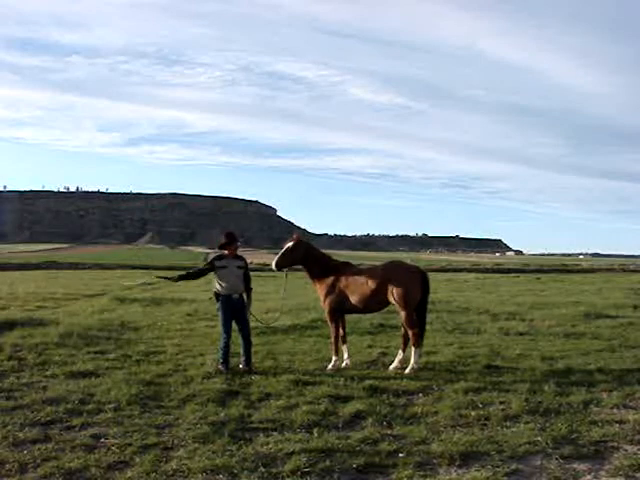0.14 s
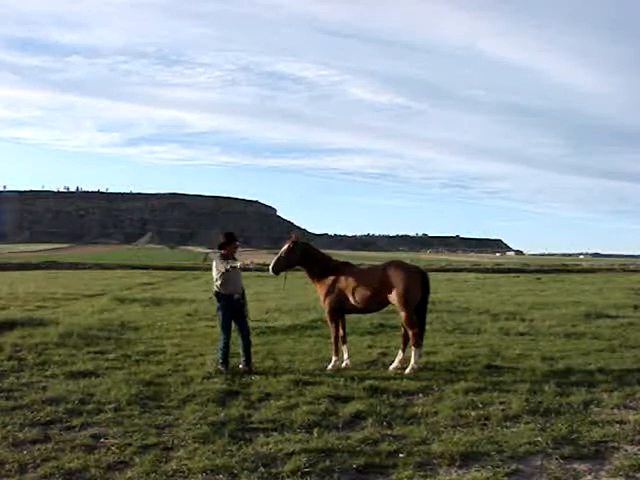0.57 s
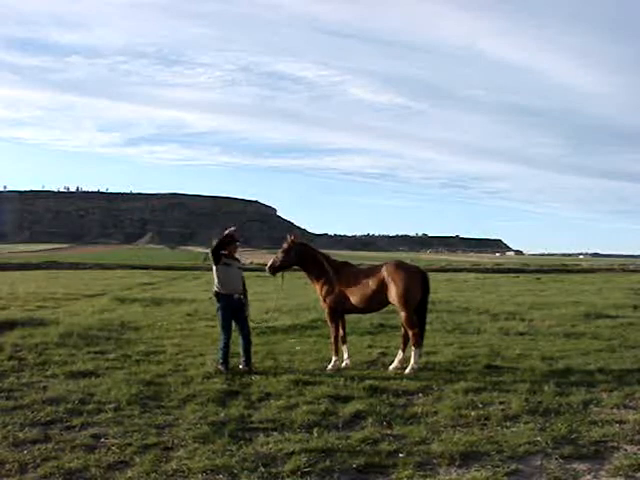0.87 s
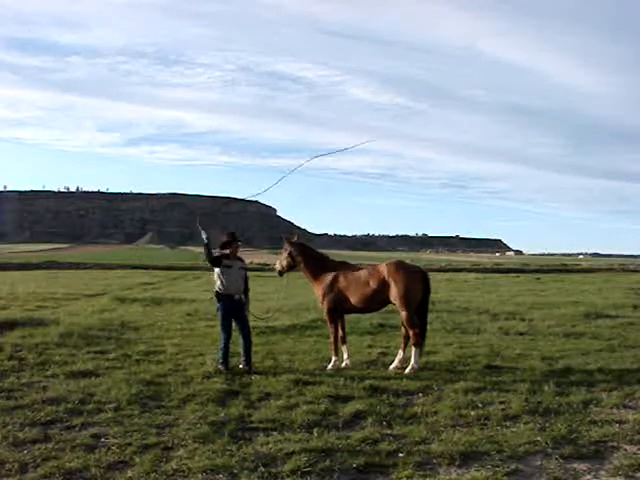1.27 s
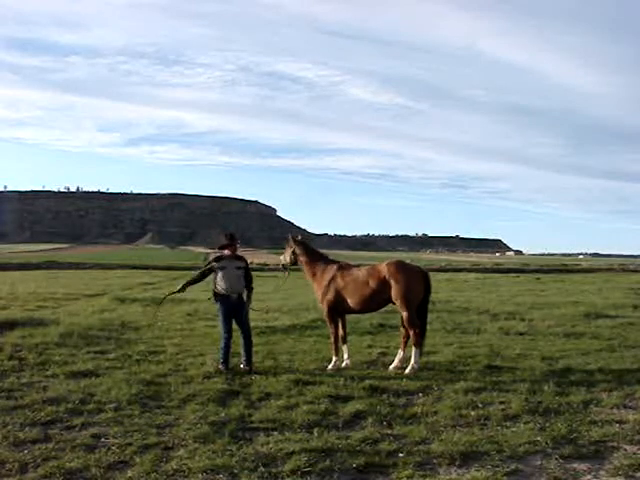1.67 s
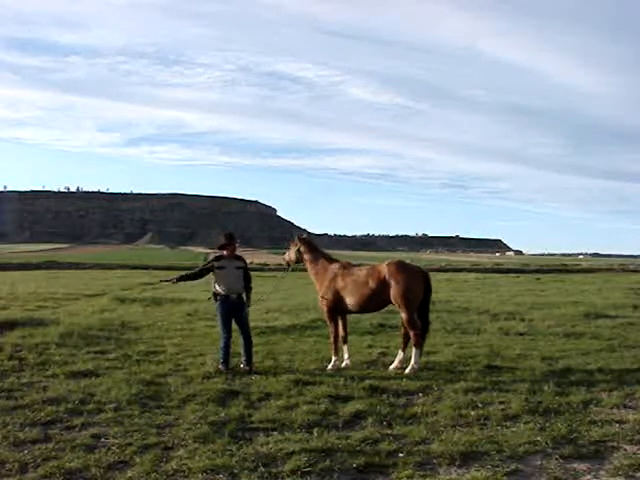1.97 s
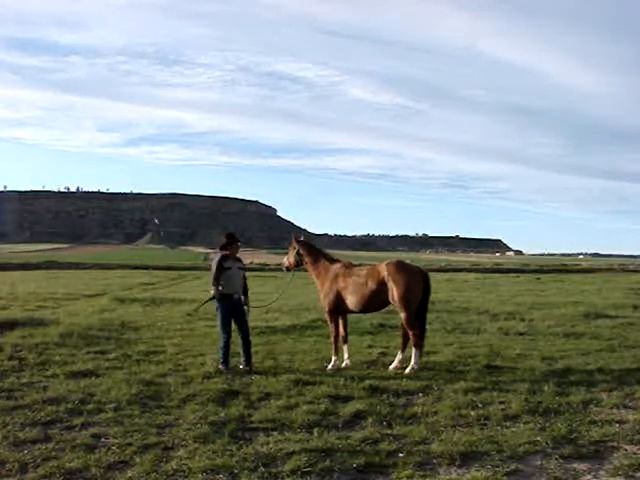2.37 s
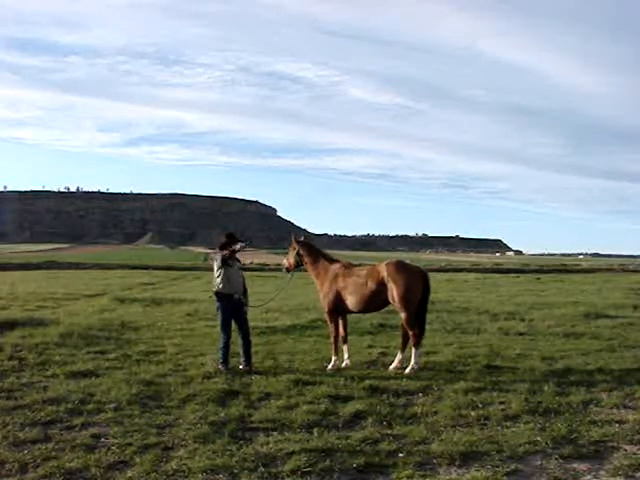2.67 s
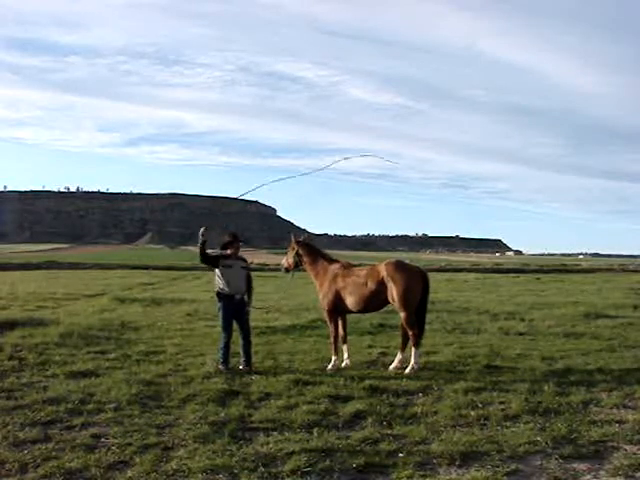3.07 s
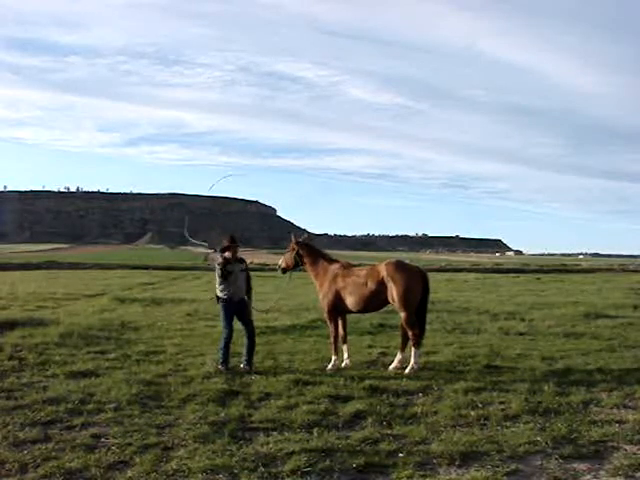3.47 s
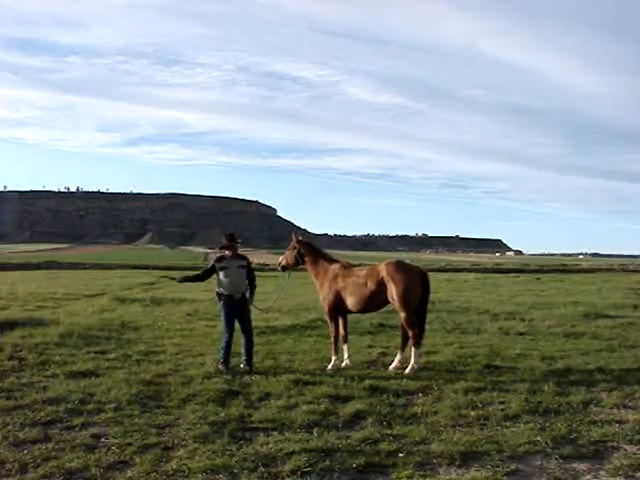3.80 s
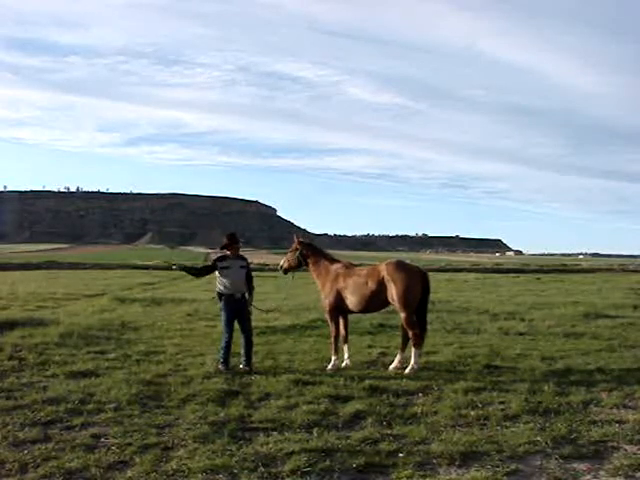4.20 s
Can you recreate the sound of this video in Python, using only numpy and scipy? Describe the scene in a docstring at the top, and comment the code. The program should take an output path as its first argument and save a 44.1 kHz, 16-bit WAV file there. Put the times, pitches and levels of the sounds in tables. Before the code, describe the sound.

A bull whip cracks twice in an open pasture, each sharp snap answered by slapping echoes, with faint swishes, grass rustles and light wind between.

```python
"""In an open pasture a bull whip is swung and cracked twice, heard by a small camera some metres away.
Each crack is rising chirps, sharp pressure jumps, and noise from torn air and from grass that scatters the blow.
The land answers with single slaps, crackle and a thin hiss; the echo of an earlier crack dies away at the start.
Narrow noise makes the lash swish, coloured clicks make it rustle, and ringing leather makes it flick.
Low, lumpy noise is light wind at the microphone, over open-air hiss and the camera's steady whirr."""
import sys
import numpy as np
from scipy import signal
from scipy.fft import rfft, irfft
from scipy.io import wavfile
from scipy.ndimage import uniform_filter1d

SR = 44100
rng = np.random.default_rng(int(sys.argv[2]) if len(sys.argv) > 2 else 0)


def digitize_waveform(pressure):
    """Quantize a signal to 16-bit integers and store it at the path in sys.argv[1].

    Rows of a 2-D input are taken as channels; values are limited to [-1, 1].
    """
    field = np.atleast_2d(pressure).T
    bounded = np.clip(field, -1, 1)
    quanta = np.round(bounded * 32767).astype(np.int16)
    wavfile.write(sys.argv[1], SR, quanta)


N = 191589
T = np.arange(N) / SR  # time of every sample, s
TOP_HZ = 10100  # the microphone passes nothing much above this


def undb(db):
    """Turn decibels into a gain."""
    return 10 ** (np.asarray(db) / 20)


def unit(x):
    """Scale to an rms of 1."""
    return x / np.sqrt(np.mean(x ** 2))


def noise():
    """White noise: all pitches equally strong."""
    return rng.standard_normal(N)


def ring(x, hz, width_hz):
    """One resonance, with gain 1 at its centre."""
    b, a = signal.iirpeak(min(hz, SR / 3), hz / min(width_hz, SR / 4), fs=SR)
    return signal.lfilter(b, a, x + 1e-18)


def dull(x, hz):
    """Gently take away the treble above hz."""
    low_pass = signal.butter(2, min(hz, SR / 3), fs=SR, output="sos")
    return signal.sosfilt(low_pass, x + 1e-18)


def colour(x, spectrum):
    """Filter through (pitch_hz, level_db) points without sounding early; the result has an rms of 1."""
    size = 4096
    hz, db = np.transpose(spectrum)
    bin_hz = np.arange(size // 2 + 1) * SR / size
    log_gain = np.log(undb(np.interp(np.log(bin_hz + 1), np.log(hz), db)))
    # folding the cepstrum forward in time gives a minimum-phase filter
    cepstrum = irfft(log_gain)[:size // 2]
    cepstrum[1:] *= 2
    response = irfft(np.exp(rfft(cepstrum, size)))
    return unit(signal.fftconvolve(x, response)[:N])


def walk(rate):
    """Slow random drift with an rms of 1 and about rate new values a second."""
    step = int(SR / rate)
    held = np.repeat(rng.standard_normal(N // step + 2), step)
    return unit(uniform_filter1d(held, step)[:N])


def grains(rate, spread_db):
    """Random clicks of uneven size and either sign, about rate a second."""
    size = undb(spread_db * np.clip(noise(), -2, 2)) * np.sign(noise())
    return size * (rng.random(N) < rate / SR)


def bursts(rows, rise_s=0.00073):
    """Loudness curve of bursts that rise fast, hold and then die away by 60 dB in t60."""
    power = np.zeros(N)
    for s, db, hold, t60 in rows:
        near = slice(int(s * SR), int((s + hold + t60) * SR))
        age = T[near] - s
        fall_db = 60 * np.maximum(age - hold, 0) / t60
        power[near] += (undb(db - fall_db) * np.clip(age / rise_s, 0, 1)) ** 2
    return np.sqrt(power)


def swell(s, db, width):
    """Bell-shaped loudness curve."""
    return undb(db) * np.exp(-((T - s) / width) ** 2 / 2)


def n_wave(s, length, rebound=1):
    """A sudden pressure drop, a straight rise past zero up to the share rebound, and a jump back."""
    u = (T - s) / length
    return ((1 + rebound) * u - 1) * ((u >= 0) & (u < 1))


# rising chirps of the racing tip, fainter ones first, stronger ones leading into the shocks
# columns: start_s, level_db, length_s, first_pitch_hz, last_pitch_hz
TIP_CHIRPS = [(1.824, -23, 0.0043, 890, 2800), (1.841, -10, 0.00496, 830, 1940),
              (3.869, -10.5, 0.0032, 1070, 1700), (3.8798, -5, 0.0051, 578, 2270)]


def tip_chirps():
    """The racing tip's wave swells late in each chirp while it is squeezed upward in pitch."""
    out = np.zeros(N)
    for s, db, length, first_hz, last_hz in TIP_CHIRPS:
        u = np.clip((T - s) / length, 0, 1)
        pitch_hz = first_hz * (last_hz / first_hz) ** u * (u > 0)
        phase = 2 * np.pi * np.cumsum(pitch_hz) / SR
        out += undb(db) * np.sin(np.pi * u ** 2) * np.sin(phase)
    return out


# sharp pressure jumps of the cracks, and one hard return from the land
# columns: start_s, peak_db, length_s
PRESSURE_JUMPS = [(1.8457, 0, 0.00032), (1.8521, -8, 0.0002), (1.857, -7.5, 0.0005),
                  (3.8834, -16.5, 0.0027), (3.8862, 3, 0.00077), (4.0356, -6, 0.0008)]


def pressure_jumps():
    """The pressure drops suddenly, rises straight past zero and jumps back."""
    return sum(undb(db) * n_wave(s, length, rebound=0.49) for s, db, length in PRESSURE_JUMPS)


# bursts of torn air around the tip
# columns: start_s, level_db, hold_s, fall_by_60_db_s
TEARS = [(1.830, -24, 0.01, 0.014), (1.845, -10.5, 0.0136, 0.031), (3.868, -25, 0.0092, 0.01),
         (3.880, -20, 0.0046, 0.011), (3.884, -9.5, 0.0037, 0.0073)]
# tone of the torn air
# columns: pitch_hz, relative_level_db
TEAR_COLOUR = [(60, -12), (200, -11.5), (330, 0.5), (420, -29), (520, 0.5), (850, -10), (1050, -11.5),
               (1400, 1), (2000, 0), (2800, -3.5), (3800, -1), (5000, -11), (7500, -15.5), (10000, -24)]


def torn_air():
    """Air torn by the tip gives short bursts of dense, uneven clicks."""
    return bursts(TEARS) * colour(grains(6000, spread_db=3), TEAR_COLOUR)


# the shock scattered by the grass
# columns: start_s, level_db, hold_s, fall_by_60_db_s
SCATTER = [(1.860, -20.5, 0.0071, 0.31), (3.888, -19.5, 0.008, 0.054), (3.897, -16, 0.026, 0.096)]
# tone of the scattered sound
# columns: pitch_hz, relative_level_db
SCATTER_COLOUR = [(100, -7), (250, -17.5), (500, -11), (850, -5.5), (1250, -3.5), (1700, -3), (2400, 0),
                  (3600, 0.5), (4700, -4), (6000, -15), (7700, -12.5), (10000, -23.5)]


def grass_scatter():
    """Tufts of grass break the blow into many uneven returns that die away."""
    tufts = grains(5000, spread_db=4)
    return bursts(SCATTER) * colour(tufts, SCATTER_COLOUR)


def cracks():
    """The tip's chirps, the pressure jumps, the torn air and the scatter from the grass together."""
    return tip_chirps() + pressure_jumps() + torn_air() + grass_scatter()


def slope_echo(s, db, rise_s, t60):
    """Loudness curve that grows until s and then dies away."""
    return undb(db - 60 * np.maximum((s - T) / rise_s, (T - s) / t60))


def slap(s, delay, hz):
    """One broad face's echo, scaled to a peak of 1: the way over grass takes off both bass and treble."""
    narrowed = ring(n_wave(s, SLAP_S), hz, 0.41 * hz)
    dulled = dull(narrowed, 2160 / delay)  # a longer way loses more treble
    return dulled / np.abs(dulled).max()


def crackle(rate, spectrum, spread_db):
    """Many faint copies of a rising chirp like the tip's, dulled by distance."""
    copy_s = 0.001586
    u = np.arange(int(copy_s * SR)) / (copy_s * SR)
    chirp = np.sin(np.pi * u ** 2 * copy_s * TOP_HZ)  # sweeps from 0 to TOP_HZ
    copies = signal.fftconvolve(grains(rate, spread_db), chirp)[:N]
    return colour(unit(copies) + 0.14 * noise(), spectrum)


# each throw has its own pace and aim; the first crack comes before the start
# columns: crack_s, relative_thong_speed, then echo gain: ground_db, bank_db, scrub_db, bluff_db
THROWS = [(-.146, 1, -12, -16, 1.5, -14), (1.8556, 1.06, -15, -11.5, -9, -8.5),
          (3.886, 0.936, -0.5, -1, 0.5, -0.5)]
# names of the parts of the land that return the crack
ZONES = ("ground", "bank", "scrub", "bluff")
# rough slopes that send back a crackle, before the throw's echo gain
# columns: zone, delay_of_peak_s, level_db, rise_by_60_db_s, fall_by_60_db_s
SLOPES = [("ground", 0.079, -18.5, 0.19, 0.053), ("bank", 0.1356, -13, 0.087, 0.14),
          ("bank", 0.1924, -23, 0.13, 0.19)]
# broad faces that answer with a slap, before the throw's echo gain
# columns: zone, delay_s, peak_db, centre_pitch_hz
FACES = [("ground", .066, 2.5, 2220), ("ground", .079, 0, 1980), ("ground", .082, -4.5, 1900),
         ("ground", .099, -5, 1880), ("ground", .1055, -3.5, 2270), ("bank", .122, -8, 1900),
         ("bank", .142, -9, 2370), ("bank", .1487, 4, 1950), ("bank", .1513, -1, 3800),
         ("bank", .168, -8, 1900), ("bank", .1945, -7, 2000), ("scrub", .262, -27, 2200),
         ("scrub", .2865, -19, 2600), ("scrub", .2965, -20, 1550), ("scrub", .304, -23, 3100),
         ("scrub", .3185, -24, 2900), ("scrub", .403, -28, 3100), ("scrub", .451, -30, 2600),
         ("scrub", .491, -25, 2700), ("bluff", .350, -12.5, 1500)]
# tone of the slopes' crackle
# columns: pitch_hz, relative_level_db
ECHO_COLOUR = [(200, -34), (550, -31), (950, -12), (1350, -5.5), (1900, 0.5), (2400, -8), (3300, -9),
               (4100, -23.5), (5000, -27), (7200, -22.5), (9900, -36)]
# tone of the scrub's hiss
# columns: pitch_hz, relative_level_db
SCRUB_COLOUR = [(300, -60), (1300, -18), (2200, 2), (3000, 4.5), (3900, 0.5), (5200, -10), (9900, -26)]
# scrub hiss, before the throw's echo gain; rise and fall are times for 60 dB
SCRUB_DB, SCRUB_DELAY_S, SCRUB_RISE_S, SCRUB_T60_S = -39, 0.13, 0.12, 1.21
SLAP_S = 0.00023  # length of the pressure wave behind each slap
SLAP_TAIL_DB, SLAP_TAIL_T60_S = -24, 0.09  # scatter behind each slap, relative to its peak


def echoes():
    """The same land answers every crack: slopes crackle, scrub hisses thinly, broad faces slap."""
    slaps, crackle_power, hiss_power = np.zeros((3, N))
    for crack_s, _, *zone_db in THROWS:
        aim_db = dict(zip(ZONES, zone_db))
        for zone, delay, db, rise_s, t60 in SLOPES:
            crackle_power += slope_echo(crack_s + delay, db + aim_db[zone], rise_s, t60) ** 2
        scrub_db = SCRUB_DB + aim_db["scrub"]
        hiss_power += slope_echo(crack_s + SCRUB_DELAY_S, scrub_db, SCRUB_RISE_S, SCRUB_T60_S) ** 2
        for zone, delay, face_db, hz in FACES:
            s, db = crack_s + delay, face_db + aim_db[zone]
            if 0 < s < T[-1] - SLAP_S:
                slaps += undb(db) * slap(s, delay, hz)
                # a short scatter drags behind the slap
                crackle_power += bursts([(s, db + SLAP_TAIL_DB, 0, SLAP_TAIL_T60_S)]) ** 2
    slopes = np.sqrt(crackle_power) * crackle(1400, ECHO_COLOUR, spread_db=6)
    scrub = np.sqrt(hiss_power) * crackle(2500, SCRUB_COLOUR, spread_db=1.5)
    return slaps + slopes + scrub


def eddy(s, db, width, hz, share):
    """A swell of narrow noise shed by the moving thong."""
    narrow = ring(ring(noise(), hz, share * hz), hz, share * hz)
    return swell(s, db, width) * unit(narrow)


# stretches of the thong that cut the air before every crack, at relative speed 1
# columns: lead_before_crack_s, level_db, swell_width_s, pitch_hz, filter_width_as_share_of_pitch
THONG = [(0.12, -42.5, 0.013, 2400, 0.45), (.09, -41, 0.023, 800, 0.88), (0.068, -41, 0.037, 338, 0.43),
         (0.0068, -28, 0.0076, 401, 0.16)]


def thong_swishes():
    """A faster throw swishes later, louder, shorter and higher."""
    out = np.zeros(N)
    for crack_s, speed, *_ in THROWS:
        speed_db = 69 * np.log10(speed)  # eddies grow steeply with speed
        for lead, db, width, hz, share in THONG:
            out += eddy(crack_s - lead / speed, db + speed_db, width / speed, hz * speed, share)
    return out


# lone eddy tones of the circling lash
# columns: centre_s, level_db, swell_width_s, pitch_hz, filter_width_as_share_of_pitch
WHISTLES = [(.79, -47.5, 0.042, 176.5, 0.057), (1.7525, -32.5, 0.0027, 2700, 1.2),
            (1.753, -24.5, 0.0017, 4980, .12), (1.762, -37, 0.0035, 4180, 0.46)]


def whistles():
    """The circling lash sheds lone swells of narrow noise."""
    return sum(eddy(*row) for row in WHISTLES)


# the lash brushing through the grass
# columns: start_s, level_db, hold_s, fall_by_60_db_s
RUSTLES = [(.745, -47.5, 0.0038, 0.054), (.815, -44, 0.011, 0.059), (.832, -37, 0.0068, 0.052),
           (2.760, -37, 0.0031, 0.078), (2.829, -32, 0.011, 0.042)]
# tone of the rustle
# columns: pitch_hz, relative_level_db
RUSTLE_COLOUR = [(88, -31), (150, -7), (792, -6.5), (1070, -5.5), (2260, -5.5), (2840, -6.5), (4330, -6.5),
                 (5930, -14.5), (9860, -17), (12800, -84), (21700, -120)]


def rustles():
    """The lash brushing the grass gives short bursts of uneven clicks."""
    return bursts(RUSTLES, rise_s=0.001) * colour(grains(3000, spread_db=3.5), RUSTLE_COLOUR)


# small flicks of leather
# columns: start_s, peak_db, tautness_as_pitch_factor
FLICKS = [(1.231, -25.5, 1.96), (1.234, -30, 1.55), (2.759, -14.5, 1.1), (2.766, -24.5, 0.94),
          (3.288, -35.5, 2.33)]
# the leather's resonances, with pitch at tautness 1
# columns: pitch_hz, width_hz, relative_level_db
LEATHER = [(960, 200, 5), (1310, 180, 6), (1560, 150, -12), (3460, 2100, 5)]


def leather_flicks():
    """A tiny blow sets the leather ringing; tauter leather rings higher."""
    out = np.zeros(N)
    for s, db, taut in FLICKS:
        blow = dull(n_wave(s, 0.00035), 3600)
        flick = sum(undb(mode_db) * ring(blow, taut * hz, width) for hz, width, mode_db in LEATHER)
        out += undb(db) * flick / np.abs(flick).max()
    return out


def lash():
    """Eddies behind the moving thong, its brush through the grass and small flicks of leather."""
    return rustles() + thong_swishes() + whistles() + leather_flicks()


# tone of the wind before its low resonance
# columns: pitch_hz, relative_level_db
WIND_COLOUR = [(20, 0.5), (85, -1), (260, -5), (400, -13), (900, -59)]
# the long gust's course, before its random lumps
# columns: time_s, level_db
GUST = [(2.55, -62), (2.57, -66), (2.598, -40.5), (2.69, -33), (2.708, -40), (2.772, -34.5), (2.786, -42),
        (3.062, -61), (3.268, -44.5), (3.328, -46), (3.578, -44.5), (3.618, -55), (3.652, -44.5),
        (3.82, -48.5)]
# short puffs of wind
# columns: centre_s, level_db, swell_width_s
PUFFS = [(0.342, -37.5, .005), (.515, -48.5, 0.021), (1.435, -52, 0.016), (2.5, -44.5, 0.009),
         (2.614, -40, 0.0059)]
# a harder gust buffets at a higher pitch
SOFT_WIND_DB, SOFT_WIND_HZ, HARD_WIND_DB, HARD_WIND_HZ = -46, 78, -37, 121


def buffeting(hz, width_hz):
    """Wind noise gathered around one low pitch, with an rms of 1."""
    return unit(ring(colour(noise(), WIND_COLOUR), hz, width_hz))


def wind():
    """Lumpy buffeting at the microphone: a long gust and short puffs over a faint flutter."""
    flutter = undb(-63 + 3 * walk(14)) * buffeting(72, 310)
    gust_db = np.interp(T, *np.transpose(GUST), left=-np.inf, right=-np.inf)
    gust = undb(gust_db + 2 * walk(30))
    strength = gust + sum(swell(*puff) for puff in PUFFS)
    # share of the power that goes to the higher pitch
    hard = np.interp(strength, undb([SOFT_WIND_DB, HARD_WIND_DB]), [0, 1])
    low = buffeting(SOFT_WIND_HZ, 0.84 * SOFT_WIND_HZ)
    high = buffeting(HARD_WIND_HZ, 0.84 * HARD_WIND_HZ)
    return flutter + strength * (np.sqrt(1 - hard) * low + np.sqrt(hard) * high)


# steady whirr of the camera, with widths before they are broadened
# columns: pitch_hz, width_hz, level_db
WHIRR = [(395.7, 50, -65.5), (750, 91, -62.5), (827, 26, -60), (893, 91, -60.5), (1030, 31, -63),
         (1428, 135, -61), (2012, 85, -59)]


def camera_whirr():
    """Narrow bands of noise make a restless whirr at a steady level."""
    out = np.zeros(N)
    for hz, width, db in WHIRR:
        filter_hz = 1.25 * width  # broadened because the filter is used twice
        out += undb(db) * unit(ring(ring(noise(), hz, filter_hz), hz, filter_hz))
    return out


# tone of the open-air hiss
# columns: pitch_hz, relative_level_db
AIR = [(25, -16), (70, -9), (170, -3), (300, -8), (520, -5), (830, -4.5), (1200, -8), (1750, -10.5),
       (2400, -11), (4000, -14.5), (7000, -17.5), (9900, -22.5)]


def open_air():
    """Coloured noise whose level wavers slightly around a faint middle."""
    return undb(-52.5 + 0.66 * walk(6.04)) * colour(noise(), AIR)


def scene():
    """Everything that reaches the one microphone."""
    return (cracks() + echoes() + lash() + wind() + camera_whirr() + open_air())[None]


def record(dry):
    """The microphone overloads sooner on one side, which leaves a low thump; the treble is cut."""
    limit = np.where(dry > 0, .66, .88)
    clipped = dry / (1 + (dry / limit) ** 4) ** (1 / 4)
    bass_cut = signal.butter(1, 18, "high", fs=SR, output="sos")
    treble_cut = signal.ellip(12, .2, 85, TOP_HZ, fs=SR, output="sos")
    return signal.sosfilt(treble_cut, signal.sosfilt(bass_cut, clipped))


dry = scene()
out = record(dry)
digitize_waveform(out)
```